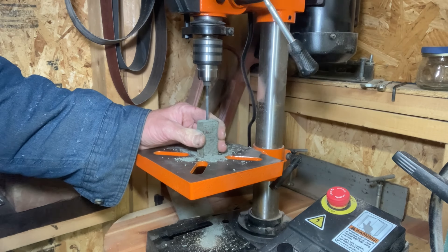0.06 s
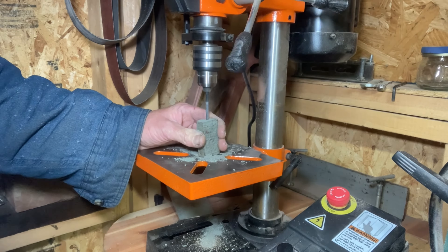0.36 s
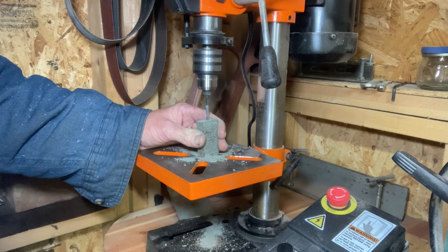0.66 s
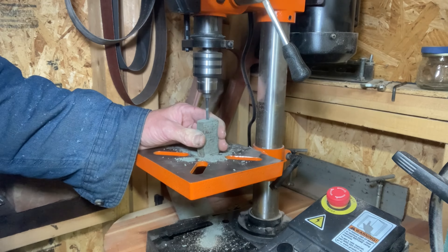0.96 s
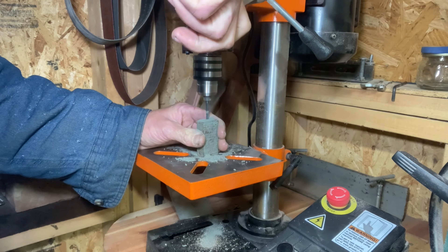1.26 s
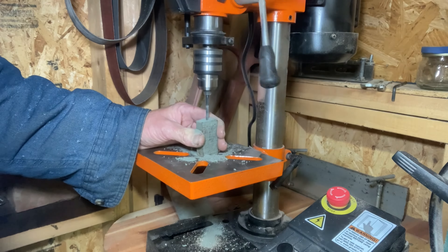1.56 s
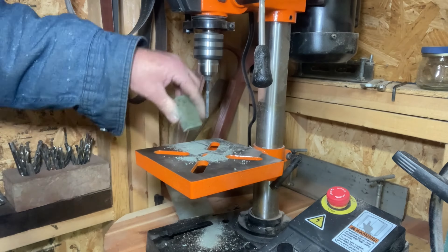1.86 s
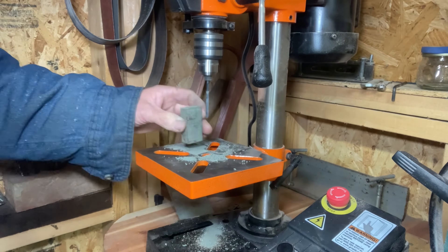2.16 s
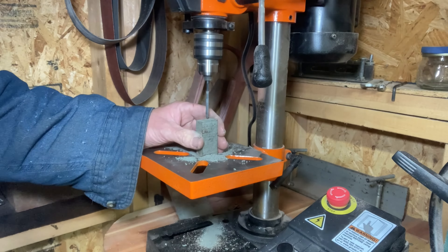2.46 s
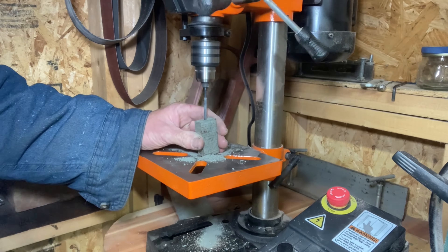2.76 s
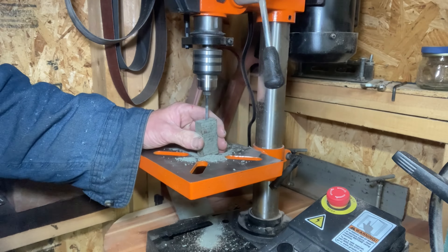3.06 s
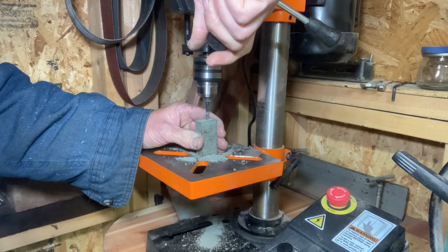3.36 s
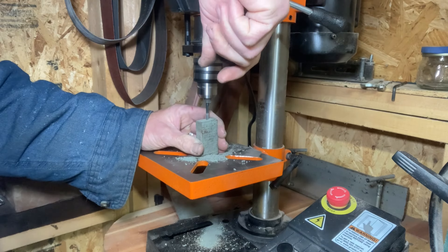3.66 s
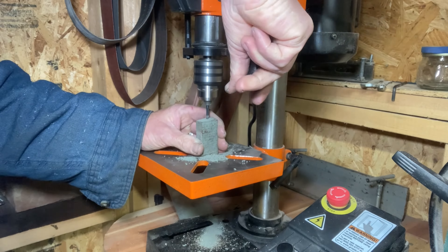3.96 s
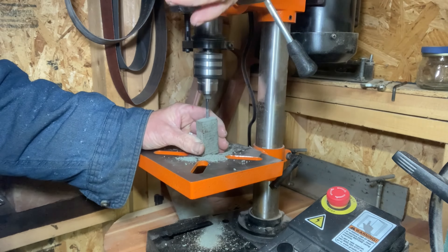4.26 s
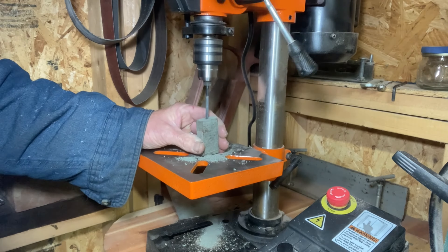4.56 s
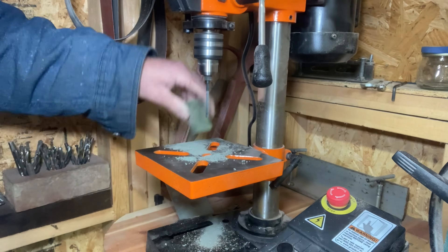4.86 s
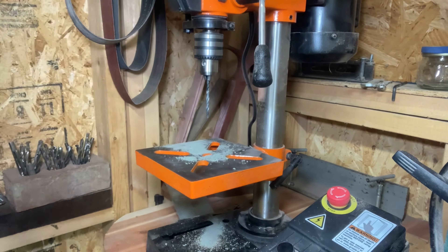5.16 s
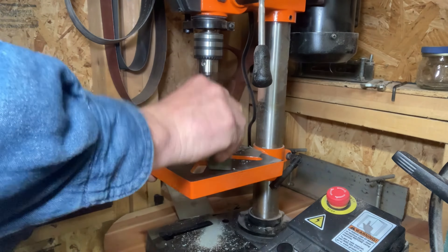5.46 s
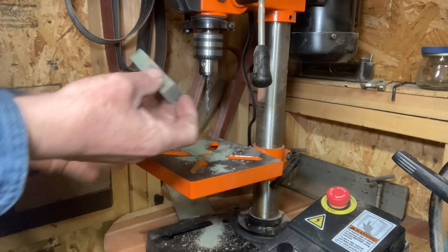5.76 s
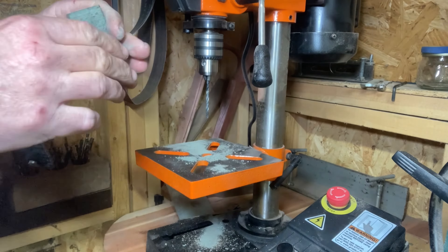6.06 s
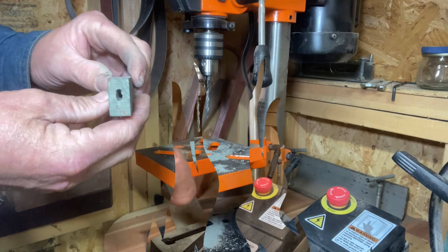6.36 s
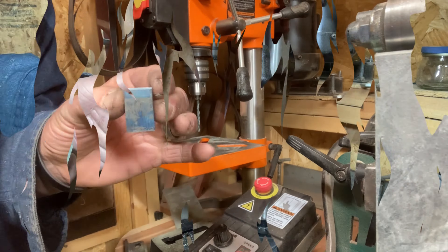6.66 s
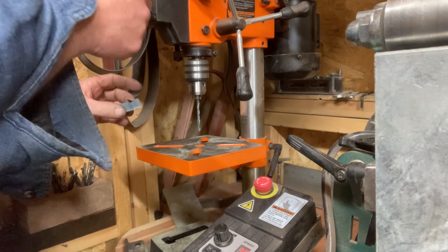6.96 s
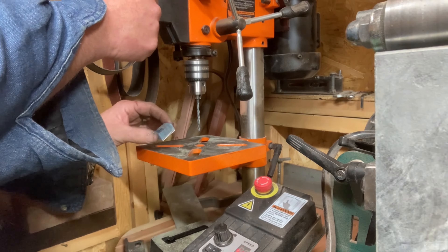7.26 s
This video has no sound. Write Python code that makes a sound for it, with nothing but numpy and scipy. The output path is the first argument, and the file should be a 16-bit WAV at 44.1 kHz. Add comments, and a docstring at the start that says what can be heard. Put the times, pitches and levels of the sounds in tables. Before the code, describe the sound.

A drill press hums and whirrs close by, then stops as a stone block knocks on metal, followed by quick ringing taps.

```python
"""You hear a bench drill press humming close by in a small wooden workshop, running rough in spells.
Its motor hums, its frame shakes and its belt and bearings whirr, until the sound dies away.
A stone block knocks on the metal drill table as it is lifted off, and the background dips briefly.
Then a quick run of hard taps sets the table ringing.
The room's soft noise, a faint electric hum and one last tick remain."""
import sys
import numpy as np
from scipy import signal
from scipy.fft import rfft, irfft, next_fast_len
from scipy.io import wavfile
from scipy.ndimage import uniform_filter1d, minimum_filter1d, map_coordinates

SR = 44100
rng = np.random.default_rng(int(sys.argv[2]) if len(sys.argv) > 2 else 0)


def transcribe(signal):
    """Save signal, clipped to [-1, 1], as a 16-bit WAV file at the path in sys.argv[1]."""
    frames = np.atleast_2d(signal).T
    limited = np.clip(frames, -1, 1)
    pcm = np.round(limited * 32767).astype(np.int16)
    wavfile.write(sys.argv[1], SR, pcm)


N = 326730
TIME = np.arange(N) / SR  # seconds, one value per sample
HIT_TIME = np.arange(-SR // 100, SR // 8) / SR  # seconds around a hit, with the contact at 0


def drill():
    """The motor feeds steady power into its hum and the shaking frame; then all of it dies away."""
    # Spells of rough running. Each row: middle in seconds, length in seconds, strength from 0 to 1.
    rough_spells = [(1.8, 0.57, 0.9), (3.15, 0.93, 0.8), (3.95, 1, 0.3), (4.8, 0.73, 0.64)]
    roughness, = swells(rough_spells)
    hum, overtone = motor(roughness)
    rattle, buzz, drone = frame(roughness)
    low_sounds = steady(hum + rattle, seconds=0.018) + overtone + buzz + drone
    return run_down(seconds=0.51) * low_sounds + run_down(seconds=0.47) * belt_and_bearings()


def motor(roughness):
    """The motor hums at a slightly drifting pitch and wavers more when it runs rough."""
    # How hard the motor hums. Each row: time in seconds, level in dB.
    effort = [(0.0, -35.5), (0.63, -32.5), (0.96, -34), (0.98, -43), (1.05, -32.5), (1.66, -34.5),
              (2.02, -27.5), (2.08, -32), (2.47, -26.5), (2.67, -31), (3.0, -29.5), (3.17, -27),
              (3.36, -28.5), (3.96, -26), (4.22, -30.5), (4.52, -28.5), (4.84, -37.5)]
    # The tones of motor and spindle. Each row: multiple of the hum's pitch, relative level in dB.
    spin_tones = [(1, 10.5), (.925, -1)]
    # The narrow noise that makes the hum waver. Each row: frequency in Hz, relative level in dB.
    waver_band = [(60, -120), (90, -20), (101, -5), (110, 0), (126, 0), (137, -4), (152, -12), (180, -35),
                  (260, -120)]
    # The overtone's one long swell. The row: middle in seconds, length in seconds, boost in dB.
    overtone_swell = [(1.4, 4.8, 8)]
    pitch_hz, drift_hz, flutter_radians = 120.3, 0.918, 0.35
    phase = 2 * np.pi * np.cumsum(pitch_hz + drift_hz * wobble(3)) / SR
    clean = unit(sum(amp(db) * np.sin(multiple * phase + flutter_radians * wobble(5.2))
                     for multiple, db in spin_tones))
    waver_share = np.clip(0.22 + 0.6 * roughness, 0, 1)
    hum = np.sqrt(1 - waver_share) * clean + np.sqrt(waver_share) * rush(colour(waver_band))
    hum /= np.sqrt(running_power(hum, SR // 16))
    effort_db = np.interp(TIME, *np.transpose(effort))
    overtone = unit(np.sin(2.035 * phase + 0.59 * wobble(12)))
    return amp(effort_db) * hum, amp(-53.5 + swells(overtone_swell)[0]) * overtone


def frame(roughness):
    """The shaken frame rattles and drones, settling late in the run, and buzzes low for a while."""
    # Where the frame likes to vibrate. Each row: frequency in Hz, width in Hz, relative level in dB.
    frame_peaks = [(56.6, 5.8, 6.5), (87.3, 9.5, 8), (147, 10, 4), (164, 39, 3.5), (213, 19, 0.5),
                   (236, 43, -3), (237, 20, -8.5), (260, 20, -11.5), (323, 21, -9.5), (330, 20, -8.5)]
    # The heavy frame gives off only low sound. Each row: frequency in Hz, gain in dB.
    frame_band = [(20, 5.5), (45, 1.5), (350, -2.5), (700, -22.5), (3000, -120)]
    # The deep drone. Each row: frequency in Hz, level in dB before it settles.
    drone_tones = [(50.1, -49), (54.4, -53)]
    settling_s = np.maximum(TIME - 2.7, 0)
    rattle_db = -38.5 + 4.5 * roughness - 0.53 * settling_s
    rattle = amp(rattle_db) * rush(lambda hz: resonances(frame_peaks)(hz) * colour(frame_band)(hz))
    buzz_hz, middle_s, length_s, peak_db = 83.7, 2.9, 1.2, -40.5
    buzz = swells([(middle_s, length_s, amp(peak_db))])[0] * tones([(buzz_hz, 0)], flutter_db=4)
    drone = amp(-3 * settling_s) * tones(drone_tones, flutter_db=2)
    return rattle, buzz, drone


def belt_and_bearings():
    """The belt whirrs low and the bearings hiss high, with faint whines and steady tones on top."""
    # The tone colour of belt and bearings. Each row: frequency in Hz, relative level in dB.
    whirr_colour = [(150, -48), (280, -5.5), (440, -1.5), (560, -4), (720, -5.5), (815, -10.5), (900, -8),
                    (1150, -11.5), (1450, -14), (2000, -17.5), (2400, -20), (5100, -28.5), (6000, -32.5),
                    (8000, -51.5), (11000, -79.5)]
    # Surges. Each row: middle in seconds, length in seconds, belt change in dB, hiss change in dB.
    surges = [(0.1, 0.93, 2.0, 3.5), (0.67, 1, 1.5, 3.5), (1.92, 0.54, 3.5, -1), (2.45, 0.86, 2.5, 0.5),
              (2.9, 0.96, 2, 2.5), (4.5, 1.8, -0.6, 2)]
    # Faint whines of the shaking frame. Each row: frequency in Hz, width in Hz, relative level in dB.
    whine_peaks = [(330, 5, 0), (425, 5, -1), (472, 5, 0)]
    # Steady tones of the running drill. Each row: frequency in Hz, level in dB.
    running_tones = [(400, -54), (700, -68), (1200, -65.5), (1600, -68.5), (2000, -68.5), (4800, -83.5),
                     (6000, -89), (6800, -90.5), (7200, -92.5)]
    hiss_from_hz = 1806
    belt_share = lambda hz: 1 / (1 + (hz / hiss_from_hz) ** 8)
    belt_surge_db, hiss_surge_db = swells(surges)
    belt = steady(rush(lambda hz: colour(whirr_colour)(hz) * np.sqrt(belt_share(hz))), seconds=0.021)
    hiss = rush(lambda hz: colour(whirr_colour)(hz) * np.sqrt(1 - belt_share(hz)))
    whine = rush(lambda hz: resonances(whine_peaks)(hz) * band(hz, 280, 560))
    whirr = amp(-41.5 + belt_surge_db) * belt + amp(-52 + hiss_surge_db) * hiss
    return whirr + amp(-54) * whine + tones(running_tones, flutter_db=1.5)


def run_down(seconds, stop_s=4.902):
    """From stop_s on, the drill fades ever faster, losing 60 dB in the given time."""
    return amp(-60 * (np.maximum(TIME - stop_s, 0) / seconds) ** 2)


def block_knocks():
    """Each knock is a dry crack, a short ring set by where the block touches, and its weight's thud."""
    # The knocks and the last tick. Each row: time in seconds, crack level in dB, the crack's centre,
    # bottom and top in Hz, its fade time in seconds, ring level in dB, ring pitch in Hz,
    # thud level in dB, left minus right in dB.
    knocks = [(4.8865, -24, 2600, 700, 4000, 0.013, -12, 1227, -26.5, 0.5),
              (4.931, -20.5, 3600, 2400, 4300, 0.011, -25, 2920, -24, -1.5),
              (4.9702, -16.5, 4020, 900, 9500, 0.016, -17, 4080, -34, -1),
              (4.9720, -17.5, 3260, 1000, 9500, 0.028, -13, 1302, -32, -2),
              (4.978, -32, 3800, 894, 8500, 0.1, -42, 3970, -45, 1),
              (5.0069, -13.5, 2600, 750, 10000, 0.018, -18.5, 1780, -20.5, -1),
              (7.394, -22, 3100, 1200, 3500, 0.0043, -21.5, 3080, -31.5, -3),
              (7.394, -35.5, 7200, 5400, 9500, 0.0022, -32, 6560, -50, -1)]
    out, t = np.zeros((2, N)), HIT_TIME
    thud = filtered(1. * (t == 0), lambda hz: band(hz, 190, 680))
    thud /= thud.max()
    for s, crack_db, centre_hz, bottom_hz, top_hz, fade_s, ring_db, ring_hz, thud_db, pan_db in knocks:
        peak = resonances([(centre_hz, 0.7 * centre_hz, 0)])
        response = lambda hz: peak(hz) * band(hz, bottom_hz, top_hz)
        snap = crack(response, strike(rise_s=0.0093, fade_s=fade_s), click_db=3.5, spread=0.16)
        ring = strike(rise_s=0.003, fade_s=1.4 * fade_s) * np.sin(2 * np.pi * ring_hz * t)
        knock = amp(crack_db) * snap + amp(ring_db) * ring + amp(thud_db) * thud
        add(out, s + t[0], pan(pan_db) * knock)
    return out


def table_taps():
    """Each tap cracks and rings the table's modes, the pitches at which it vibrates by itself."""
    # The modes. Each row: frequency in Hz, relative level in dB, base fade time in seconds.
    modes = [(932, 0, .034), (1040, -2, .032), (1310, -4.5, .017), (1770, -11.5, .017), (1950, -8.5, .016),
             (2190, -7, .014), (2950, -4.5, .015), (3510, -10.5, .014), (4000, -16.5, .013),
             (4400, -13, .014), (5000, -23, .014)]
    # The taps. Each row: time in seconds, ring level in dB, boosts in dB for the second, middle and
    # upper modes, crack level in dB, its centre in Hz, its fade in seconds, left minus right in dB.
    taps = [(5.463, -5.5, -11.5, -8, 2.5, -7.5, 2000, 0.012, -1),
            (5.5106, -4.5, 3, 6, -11.5, -15, 2000, 0.011, -1.5),
            (5.5169, -18, 1, 10.5, -2, -27.5, 2000, 0.019, -1),
            (5.5570, -10.5, 3, -9, 12, -11, 2400, 0.021, -4.5),
            (5.5623, -15.5, -2.5, 3, 8.5, -24.5, 2800, 0.062, -1.5),
            (5.590, -14.5, 1, 14, -11, -32, 2700, 0.024, -2),
            (5.6265, -6.5, 5, 3, 0.5, -8.5, 2880, 0.016, -1.5),
            (5.655, -33, 2, -1, -6, -34.5, 2400, 0.39, -1),
            (5.6630, -19, 4.5, 6, -15, -52, 2180, 0.056, -2), (5.7036, -6, -5, 5, -6, -14, 2760, 0.019, 0)]
    # The small table is weaker just below its lowest mode. Each row: frequency in Hz, gain in dB.
    low_cut = [(150, -0.5), (480, -7), (670, -12.5), (830, -0.5)]
    out, t = np.zeros((2, N)), HIT_TIME
    hz, mode_db, mode_fade_s = np.transpose(modes)[:, :, None]
    second, middle = hz == hz[1], (hz > 1700) & (hz < 2100)
    upper = np.clip(np.log2(hz / hz[0]), 0, 1)
    sign = (-1) ** np.arange(len(hz))[:, None]
    for s, ring_db, second_db, middle_db, upper_db, crack_db, centre_hz, fade_s, pan_db in taps:
        # A hard tap presses on the table and chokes it: 20 dB softer rings twice as long.
        ring_s = mode_fade_s * 0.63 * 2 ** (-ring_db / 20)
        place_db = second * second_db + middle * middle_db  # set by where the tap lands
        level_db = mode_db + place_db + upper * upper_db + rng.standard_normal(hz.shape)
        envelopes = sign * amp(level_db) * strike(rise_s=0.0044, fade_s=ring_s)
        lag = 0.28 * rng.choice([-1, 1], hz.shape)  # each mode reaches the ears slightly out of step
        ring = np.array([np.sum(envelopes * np.sin(2 * np.pi * hz * t + ear * lag), axis=0)
                         for ear in (-1, 1)])
        response = resonances([(centre_hz, 2700, 0)])
        snap = crack(response, strike(rise_s=0.0081, fade_s=fade_s), click_db=7, spread=0.26)
        add(out, s + t[0], pan(pan_db) * (amp(ring_db) * ring + amp(crack_db) * snap))
    return filtered(out, colour(low_cut))


def crack(response, envelope, click_db, spread):
    """A hard contact: one clean click inside a burst of noise that differs a little in each ear."""
    # The crack's treble falls away. Each row: frequency in Hz, gain in dB.
    crack_colour = [(100, 5), (600, 7), (950, 11.5), (3300, -6.5), (4500, -9.5), (6000, -17), (8000, -31),
                    (9400, -41.5), (10200, -55), (13000, -71)]
    shape = lambda hz: colour(crack_colour)(hz) * response(hz)
    mid, side = filtered(rng.standard_normal((2, len(HIT_TIME))), shape)
    mid /= np.sqrt(np.abs(uniform_filter1d(mid ** 2, SR // 500)) + 1e-12)  # even out the level
    click = filtered(1. * (HIT_TIME == 0), shape)
    return amp(click_db) * click / click.max() + envelope * stereo(mid, spread * unit(side))


def strike(rise_s, fade_s):
    """The loudness of a hit: it climbs 60 dB in rise_s, then falls 60 dB in fade_s."""
    return amp(-60 * np.where(HIT_TIME < 0, -HIT_TIME / rise_s, HIT_TIME / fade_s))


def table_after_ring(taps):
    """The table rings on faintly, mostly after the later taps."""
    # The long ring. Each row: frequency in Hz, width in Hz, relative level in dB.
    ring_peaks = [(992, 90, -1.5), (1400, 160, -23), (1900, 260, -9), (2940, 290, -15), (3800, 3100, -10.5)]
    # How long it lasts. Each row: frequency in Hz, seconds to fade by 60 dB.
    ring_times = [(1000, 0.43), (2000, 0.29), (6000, 0.43)]
    # When the table rings most freely. The row: middle in seconds, length in seconds, boost in dB.
    free_spell = [(5.635, 0.37, 25.5)]
    drive = taps * amp(-43.5 + swells(free_spell)[0])
    return tail(drive, resonances(ring_peaks), ring_times, spread=0.2)


def wooden_walls(hits):
    """The close wooden walls answer each hit with a short echo."""
    # Each row: frequency in Hz, seconds for the echo to fade by 60 dB.
    echo_times = [(200, 0.32), (1500, 0.17), (8000, 0.27)]
    return tail(hits, np.ones_like, echo_times, spread=0.35)


def workshop():
    """Low rumble, airy hiss and electric hum; handling the block swells the first two."""
    # The room's rumble. Each row: frequency in Hz, relative level in dB.
    rumble_colour = [(15, -50.5), (25, -20.5), (97, -1.5), (172, -9.5), (205, -8), (348, -17), (370, -24.5),
                     (394, -17.5), (430, -14.5), (500, -18), (650, -44.5), (1100, -120)]
    # The room's air. Each row: frequency in Hz, relative level in dB.
    air_colour = [(250, -24.5), (420, -4.5), (800, -3.5), (1150, -4.5), (1450, -9), (2000, -9.5),
                  (2700, -14.5), (3400, -14), (5100, -21.5), (6000, -23.5), (7000, -33.5), (8000, -43.5),
                  (10000, -65), (13000, -100)]
    # The electric hum. Each row: frequency in Hz, relative level in dB.
    mains_tones = [(83, -58), (100, -53), (110, -57), (150, -59), (198, -57.5), (300, -60.5), (400, -55.5),
                   (500, -68), (700, -60.5), (1100, -64), (1200, -62.5), (1600, -68.5), (3200, -72),
                   (4800, -76), (6800, -85.5)]
    # Soft noise as the block is picked up and turned.
    # Each row: middle in seconds, length in seconds, rumble change in dB, air change in dB.
    handling = [(6.154, 1, 6, 6.5), (5.71, 0.8, -2.5, 3.5), (7.19, 1.0, -1.5, 4)]
    rumble_swell_db, air_swell_db = swells(handling)
    rumble = amp(-47.5 + rumble_swell_db) * steady(rush(colour(rumble_colour)), seconds=0.016)
    air = amp(-54 + air_swell_db) * rush(colour(air_colour))
    mains = amp(-3) * tones(mains_tones, flutter_db=1.5)
    lull_db, lull_end_s, rise_s = -5, 5.82, 0.24  # rumble and hum stay low until the taps are over
    lull = amp(lull_db * np.clip(.5 - (TIME - lull_end_s) / rise_s, 0, 1))
    return lull * (rumble + mains) + air


def dip(x):
    """The level sinks quickly, all but drops out for a moment, and recovers; the treble sinks less."""
    t = TIME - 5.266  # seconds from the bottom of the dip
    sink_s, recover_s, dropout_s, edge_s = 0.036, 0.11, 0.026, 0.006
    sag = np.exp(-(t / np.where(t < 0, sink_s, recover_s)) ** 2)
    dropout = np.clip(1 - (np.abs(t) - dropout_s / 2) / edge_s, 0, 1)
    low = filtered(x, lambda hz: band(hz, 0, 3900))
    treble = x - low
    return amp(-27 * dropout) * (amp(-14.5 * sag) * low + amp(-8.5 * sag) * treble)


def rush(response):
    """Stereo noise of average level 1, nearly the same in both ears in the bass."""
    # How alike the two ears are. Each row: frequency in Hz, likeness from 0 to 1.
    likeness = [(40, 0.8), (120, 0.99), (250, 0.84), (500, 0.8), (1500, 0.63), (3500, 0.59), (7500, 0.6)]
    angle = lambda hz: np.arccos(np.clip(along(likeness, hz), -1, 1)) / 2
    shares = lambda hz: np.array([np.cos(angle(hz)), np.sin(angle(hz))])
    mid, side = filtered(rng.standard_normal((2, N)), lambda hz: response(hz) * shares(hz))
    return unit(stereo(mid, side))


def tones(rows, flutter_db):
    """Steady tones from (Hz, dB) rows, each fluttering a little in level and phase."""
    return np.sqrt(2) * sum(amp(db + flutter_db * wobble(9))
                            * np.sin(2 * np.pi * hz * TIME + 0.12 * wobble(5.6)) for hz, db in rows)


def tail(x, response, fade_times, spread):
    """The smooth wash of sound that follows x, each frequency dying at its own speed."""
    hz, t, spectrum = signal.stft(rng.standard_normal((2, SR // 2)), SR, nperseg=256)
    spectrum *= amp(-60 * t / along(fade_times, hz)[:, None])
    decay = filtered(signal.istft(spectrum, SR, nperseg=256)[1], response)
    decay /= np.linalg.norm(decay[0])
    mid, side = signal.fftconvolve(x.mean(axis=0)[None], decay, axes=1)[:, :N]
    return stereo(mid, spread * side)


def steady(x, seconds):
    """Even out flutter slower than the given time, but keep the slow rise and fall."""
    return x * np.sqrt(running_power(x, SR // 8) / running_power(x, int(seconds * SR)))


def running_power(x, size):
    """The power of a stereo sound, smoothed over size samples."""
    power = np.mean(x ** 2, axis=0)
    return np.abs(uniform_filter1d(uniform_filter1d(power, size), size)) + 1e-14


def swells(rows):
    """Smooth bumps from (middle s, length s, height, ..) rows: one curve per height column."""
    middle, length, *heights = np.transpose(rows)
    position = (TIME - middle[:, None]) / length[:, None]
    return np.array(heights) @ np.cos(np.pi * np.clip(position, -.5, .5)) ** 2


def wobble(rate):
    """A smooth curve through rate random values a second."""
    return map_coordinates(rng.standard_normal(int(N * rate / SR) + 4), [TIME * rate])


def filtered(x, response):
    """Shape x by a response: a function that gives the gain at each frequency."""
    n = x.shape[-1]
    padded = next_fast_len(n + 8192)
    return irfft(rfft(x, padded) * response(np.fft.rfftfreq(padded, 1 / SR)), padded)[..., :n]


def resonances(peaks):
    """A response with one peak per (Hz, width in Hz, dB) row; their powers add."""
    return lambda hz: np.sqrt(sum(
        (amp(db) * hz * width) ** 2 / ((centre ** 2 - hz ** 2) ** 2 + (hz * width) ** 2)
        for centre, width, db in peaks))


def colour(points):
    """A response drawn through (Hz, dB) points."""
    return lambda hz: amp(along(points, hz))


def band(hz, bottom_hz, top_hz):
    """Gains that fall steeply outside the two frequencies."""
    return 1 / np.sqrt((1 + (bottom_hz / (hz + 1)) ** 8) * (1 + (hz / top_hz) ** 12))


def along(points, hz):
    """Read between (Hz, value) points on a pitch-like (log) scale."""
    point_hz, values = np.transpose(points)
    return np.interp(np.log(hz + 1), np.log(point_hz + 1), values)


def amp(db):
    """Turn decibels into a gain."""
    return 10 ** (np.asarray(db) / 20)


def unit(x):
    """Scale x to an average (rms) level of 1."""
    return x / np.sqrt(np.mean(x ** 2) + 1e-20)


def stereo(mid, side):
    """Left and right from what the ears share (mid) and what differs (side)."""
    return np.array([mid + side, mid - side])


def pan(db):
    """Left and right gains for a left minus right difference in dB."""
    return amp(db * np.array([[.5], [-.5]]))


def lean(x, points):
    """Tip each frequency of x to the left or right."""
    return filtered(x, lambda hz: pan(along(points, hz)))


def add(track, s, sound):
    """Lay a sound into the track, starting at s seconds."""
    start = round(s * SR)
    track[:, start:start + sound.shape[-1]] += sound[..., :N - start]


def scene():
    """Knocks and taps near the centre, over the drill and workshop; only those last two dip."""
    # How each leans between the ears. Each row: frequency in Hz, left minus right in dB.
    drill_lean = [(60, -0.5), (130, 0.5), (300, -0.5), (680, -2.0), (1540, -2.5), (3450, -0.5), (7770, 1.5)]
    workshop_lean = [(60, -0.5), (160, -1), (420, -2.5), (1110, -4), (2940, -2.5), (7770, 2.5)]
    knocks, taps = block_knocks(), table_taps()
    after_ring = pan(-1.4) * table_after_ring(taps)
    echo = wooden_walls(amp(-13.5) * knocks + amp(-31.5) * taps)
    drill_and_room = lean(drill(), drill_lean) + lean(workshop(), workshop_lean)
    return knocks + taps + after_ring + echo + dip(drill_and_room)


def record(dry):
    """A fast limiter turns down the loudest peaks, and the very highest treble is cut off."""
    ceiling, window, top_hz = 0.97, SR // 400, 15700
    needed_gain = 1 / np.maximum(np.abs(dry).max(axis=0) / ceiling, 1)
    gain = uniform_filter1d(minimum_filter1d(needed_gain, window), window)
    return filtered(dry * gain, lambda hz: hz < top_hz)


dry = scene()
out = record(dry)
transcribe(out)
```